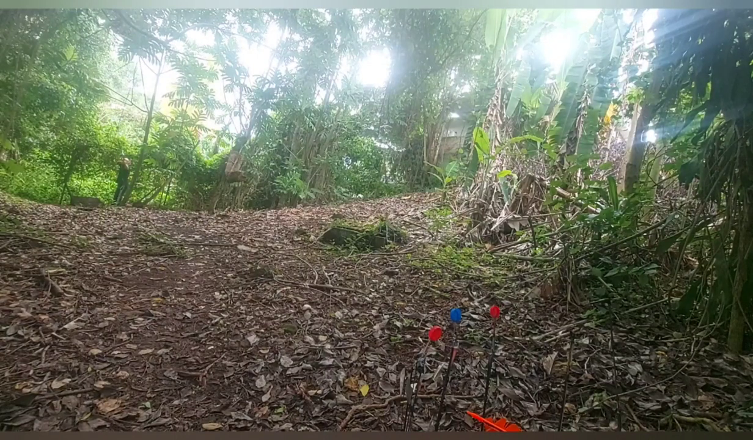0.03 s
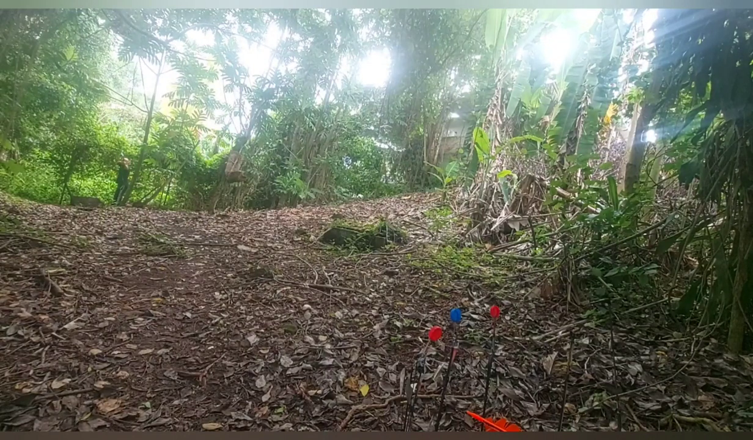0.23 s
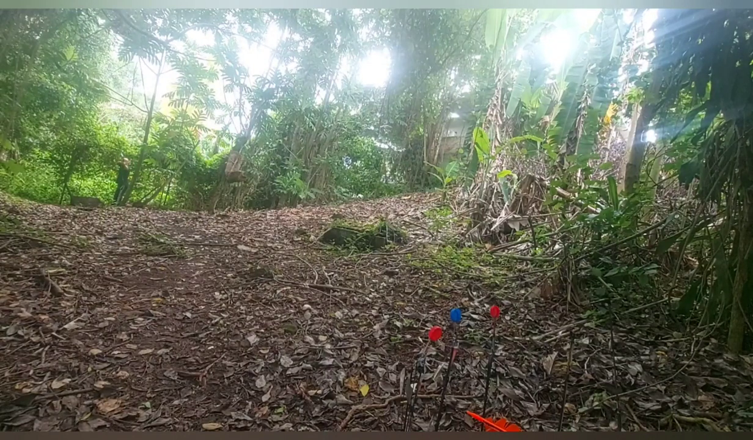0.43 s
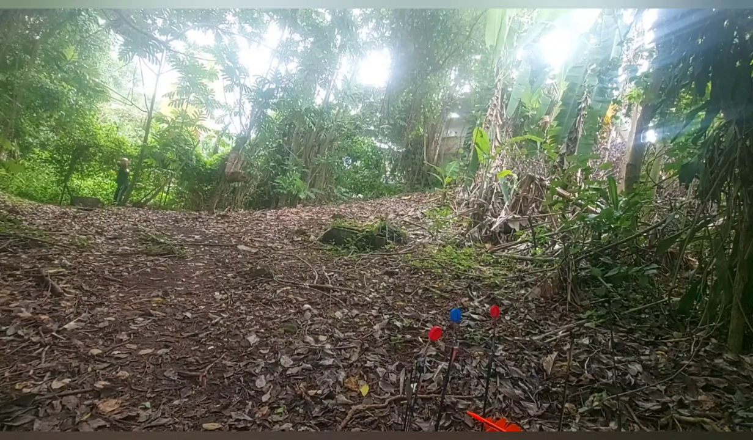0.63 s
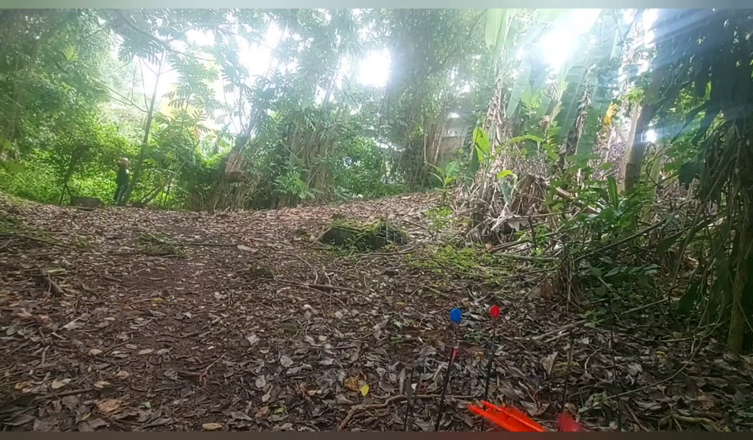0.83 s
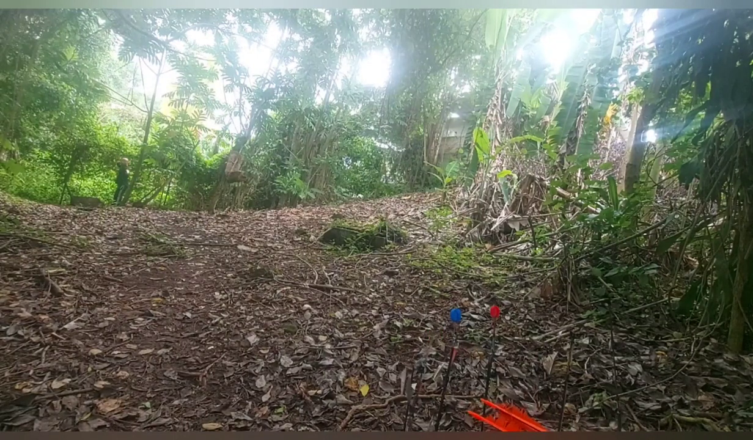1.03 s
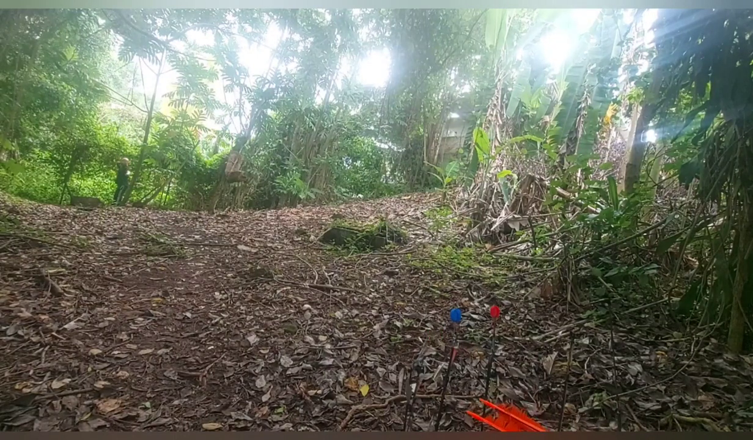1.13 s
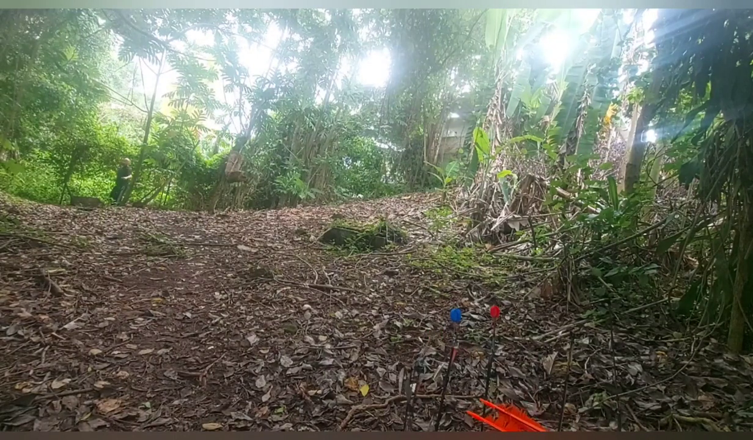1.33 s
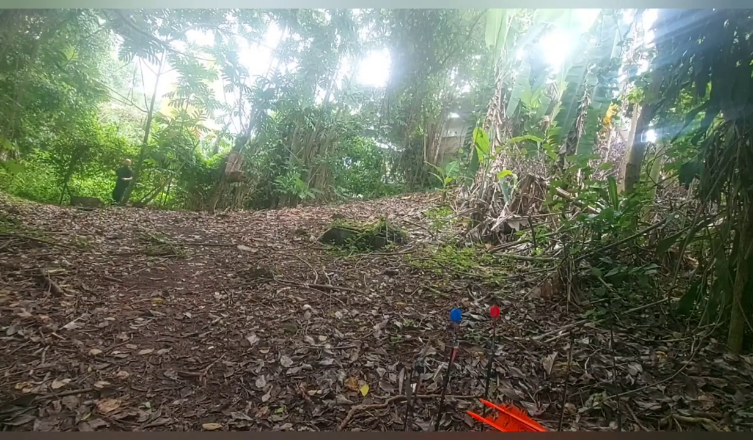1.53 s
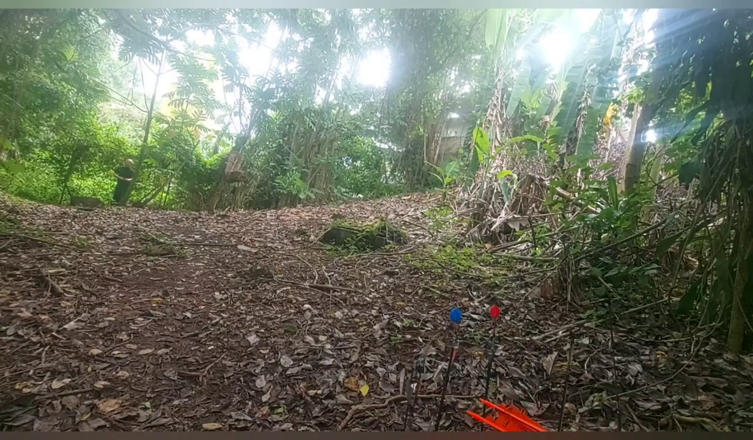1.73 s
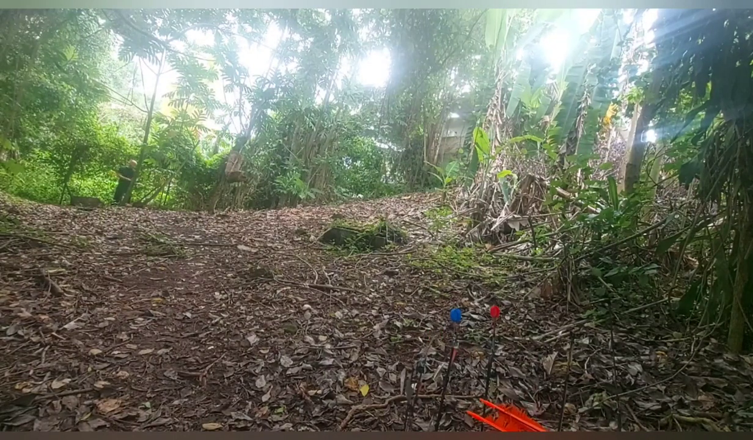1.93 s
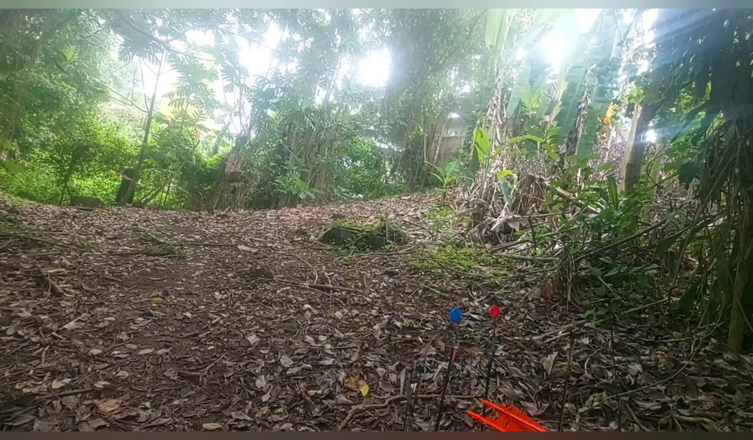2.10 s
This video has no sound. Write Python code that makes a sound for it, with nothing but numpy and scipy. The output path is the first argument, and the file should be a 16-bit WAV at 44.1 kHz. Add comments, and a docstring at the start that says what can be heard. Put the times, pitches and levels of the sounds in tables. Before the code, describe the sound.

Arrow strike: faint distant bow snap, brief whoosh, loud hard crack with thud, then leafy clicks

```python
"""An arrow flies in from far across a forest clearing, cracks through a small target and thuds into the soil.
Its vanes make sinking sine whistles and a growing noise hiss; the hits are sharp pulses, noise and fading tones.
Before the flight a far bow snaps (tones and noise); later the target drops into dry leaves (pulses and noise).
Leaves tick and stir (noise) and a far bird hoots (gliding sines) over quiet air (noise).
Trees echo the bow, thud and bird as tails of noise, and scatter the strike, the landing and a twig's snap."""
import sys
import numpy as np
from scipy import signal
from scipy.fft import rfft, irfft, next_fast_len
from scipy.io import wavfile
from scipy.ndimage import map_coordinates

SR = 44100
rng = np.random.default_rng(int(sys.argv[2]) if len(sys.argv) > 2 else 0)


def materialize(psi):
    """Save the field psi as 16-bit PCM at rate SR to the path in sys.argv[1].

    A 1-D psi becomes a single channel; in a 2-D psi each row is a channel.
    """
    bounded = np.clip(np.atleast_2d(psi).T, -1, 1)
    quanta = np.round(bounded * 32767).astype(np.int16)
    wavfile.write(sys.argv[1], SR, quanta)


N = 95388
T = np.arange(N) / SR  # time of each sample, s

# In all tables t60/s is the time to fade by 60 dB. Levels in a colour only shape the sound;
# likeness of left and right is 1 for the same, 0 for unrelated, below 0 for opposed.

# Colour of the quiet air: f/Hz, level/dB
AIR_COLOUR = [(15, -59.5), (25, -35.5), (64, -2.5), (123, -7.5), (153, -17), (326, -4), (607, -7.5),
              (659, -7.5), (734, -9.5), (840, -7.5), (1130, -13), (2000, -14), (9320, -25), (12200, -23.5),
              (16000, -38)]
# Likeness of the air on the two sides: f/Hz, likeness
AIR_LIKENESS = [(60, .9), (350, .65), (800, 0.066), (2000, 0), (10000, 0)]
# Lean of the air, added on the left and taken off on the right: f/Hz, level/dB
AIR_LEAN_LEFT = [(100, 0.5), (400, 1), (1300, 3.5), (4000, 1.3), (8000, -0.33), (15000, 3)]
# Bird hoots before the echo mix, with the pitch they glide up to: t/s, length/s, f/Hz, level/dB
BIRD_CALLS = [(.465, 0.13, 660, -60), (1.655, 0.089, 662, -62.5), (1.777, 0.0513, 615, -73),
              (1.85, .08, 675, -69.5), (1.951, 0.096, 670, -73), (2.06, .13, 630, -69.5)]
# Colour of the echo among the trees: f/Hz, level/dB
ECHO_COLOUR = [(100, -9), (500, -7), (1200, -9), (2500, -7)]
# Likeness of the two sides in wide sounds other than the air: f/Hz, likeness
WIDE_LIKENESS = [(100, 0.83), (400, 0.3), (900, -0.71), (2000, -.15), (5000, -.1), (12000, 0)]
# Ticks of dry leaves and twigs: t/s, level/dB
LEAF_TICKS = [(0.4977, -59), (0.7948, -18.5), (0.811, -25), (0.8216, -28), (0.984, -47.5), (0.988, -56.5),
              (1.129, -51), (1.178, -49.5), (1.22, -56)]
# Colour of ticks, stirring leaves and splinters: f/Hz, level/dB
LEAF_COLOUR = [(300, -16.5), (1500, -3), (3500, -3.5), (8000, -2), (16000, -10)]
# Colour of the snapping twig: f/Hz, level/dB
TWIG_SNAP_COLOUR = [(300, -36), (1100, -18), (1700, 0), (3200, -0.5), (6000, -5.5), (9000, -9),
                    (16000, -16)]
# Stirring leaves before their flutter: t/s, rise/s, t60/s, level/dB
LEAF_STIRS = [(.295, 0.071, 0.28, -56), (1.3, 0.021, 0.29, -63.5), (1.4, 0.0388, 0.22, -65),
              (2.06, .06, 0.68, -70.5)]
# Noise of the bow string: t/s, rise/s, t60/s, level/dB
STRING_NOISE = [(.554, 0.00202, .12, -50), (.566, 0.0062, 0.38, -33.5)]
# Colour of the string noise: f/Hz, level/dB
STRING_NOISE_COLOUR = [(100, -11), (400, -1), (1300, -6.5), (2200, -9), (4000, -0.5), (7200, -1),
                       (12000, -7.5), (16000, -18.5)]
# Tones of the string slipping free: f/Hz, level/dB, t60/s
STRING_SLIP = [(630, -48, .06), (1060, -56, 0.034)]
# Tones of the bow limbs: f/Hz, level/dB, t60/s
BOW_LIMBS = [(73, -51.5, .15), (302, -37, 0.22), (397, -30.5, 0.068), (1082, -44.5, .13),
             (1782, -52.5, .22), (2140, -50, 0.24)]
# Contacts of the target with the leaves, before colouring: t/s, level/dB
LEAF_CONTACTS = [(1.0271, -18), (1.0301, -15), (1.0328, -13), (1.044, -22.5), (1.0501, -23)]
# Colour of those contacts and their crunch: f/Hz, level/dB
CONTACT_COLOUR = [(40, -11), (170, 1.5), (350, 1), (900, 2.5), (1500, -5.5), (2500, -6), (4000, 1),
                  (6000, -0.5), (9000, -5), (16000, -5)]
# Colour of the landing scattered by the trees: f/Hz, level/dB
LANDING_WASH = [(100, 0), (250, 6), (900, -3.5), (1800, -2), (4000, -1), (8000, -3.5), (16000, -4.5)]
# Tones of the soil: f/Hz, level/dB, t60/s
SOIL_THUD = [(146.3, -11.5, 0.07), (297, -19.5, 0.092), (415, -30, .08), (631, -31, 0.11)]
# Whistle of the vanes, pitch at release, level before flutter and lean: f/Hz, level/dB
VANE_WHISTLE = [(870, -56.5), (730, -63), (515, -68.5)]
# Colour of the vane hiss: f/Hz, level/dB
VANE_HISS_COLOUR = [(100, -20.5), (400, -5.5), (900, -7.5), (2000, -6), (4500, -4), (8000, -3.5),
                    (13000, -2.5), (16000, -2)]
# Colour of the air pushed by the arrow: f/Hz, level/dB
PUSHED_AIR_COLOUR = [(25, -25), (70, -1.5), (110, -10.5), (220, -28.5), (1000, -47.5)]
# Colour of the point tearing in: f/Hz, level/dB
TEARING_COLOUR = [(200, -1), (1500, -1.5), (4000, 3), (7500, 2.5), (10500, -8.5), (13000, 0),
                  (16000, -13.5)]
# Colour of the point's hard crack: f/Hz, level/dB
POINT_CRACK_COLOUR = [(30, -32.5), (150, -10.5), (300, -4), (550, 6), (1000, 3.5), (1500, -5), (2600, 0.5),
                      (4000, -2.5), (7000, -16.5), (16000, -33.5)]
# Brief tones of the target's walls: f/Hz, level/dB, t60/s
TARGET_WALLS = [(2460, -6, 0.0035), (3790, -6.5, .005), (7330, -9.5, .004)]
# Hollow tones of the whole target: f/Hz, level/dB, t60/s
TARGET_HOLLOW = [(345, -7, 0.033), (549, -19.5, 0.052), (987.4, -2, 0.012)]
# Colour of the strike scattered by the trees: f/Hz, level/dB
STRIKE_WASH = [(100, -17), (300, 2), (650, 2), (1300, 0), (2300, -4.5), (3200, -1), (6500, -3.5),
               (10000, -7), (16000, -8.5)]
# Level change on the left for sounds from the right: f/Hz, level/dB
LEFT_SHADING = [(900, 1), (2200, 0), (4500, -11.5), (12000, -7)]

RELEASE_S, STRIKE_S, SECOND_WALL_S, GROUND_S = .567, .7792, .7806, .793  # the arrow's journey
SCATTER_RISE_S = .014  # build-up of both the echo and the scattering
SIDE_LAG_S = .00036  # delay of the left side for the strike and the ticks


def amp(db):
    """Turn decibels into gain."""
    return 10 ** (np.asarray(db) / 20)


def unit(x):
    """Scale to an average strength (rms) of 1."""
    return x / np.sqrt(np.mean(x ** 2) + 1e-20)


def along(points, hz):
    """Read a (f/Hz, value) curve, with straight lines between points on a log pitch axis."""
    f, value = np.transpose(points)
    return np.interp(np.log(hz + 1), np.log(f + 1), value)


def filtered(x, response):
    """Multiply the spectrum of x by a response that depends on frequency."""
    size = next_fast_len(N + SR // 2)
    hz = np.fft.rfftfreq(size, 1 / SR)
    return irfft(rfft(x, size) * response(hz), size)[..., :N]


def late(x, lag):
    """Delay x by lag seconds, by turning the phase of each frequency."""
    return filtered(x, lambda hz: np.exp(-2j * np.pi * hz * lag))


def wobble(rate):
    """A smooth random curve through rate random points a second."""
    return map_coordinates(rng.standard_normal(2048), [T * rate], mode="wrap")


def noise(colour):
    """Coloured one-channel noise of rms 1."""
    return unit(filtered(rng.standard_normal(N), lambda hz: amp(along(colour, hz))))


def wide(colour, alike):
    """Coloured stereo noise: a shared part and an opposed part, mixed to set the sides' likeness."""
    def shares(hz):
        angle = np.arccos(np.clip(along(alike, hz), -1, 1)) / 2
        return np.array([np.cos(angle), np.sin(angle)])

    mid, side = filtered(np.array([noise(colour), noise(colour)]), shares)
    return unit(np.array([mid + side, mid - side]))


def burst(s, rise, t60, db):
    """Loudness curve that starts at s, rises quickly and dies away."""
    t = np.maximum(T - s, 0)
    return amp(db - 60 * t / t60) * (1 - np.exp(-t / rise))


def ring(s, modes, rise):
    """A struck object rings at s as a sum of fading sine tones."""
    return sum(burst(s, rise, t60, db) * -np.sin(2 * np.pi * hz * (T - s)) for hz, db, t60 in modes)


def blows(rows, colour):
    """Sharp coloured pulses that start at the hit and never before it (minimum phase)."""
    hz = np.fft.rfftfreq(2 * N, 1 / SR)
    # folding the cepstrum forward in time gives the minimum-phase pulse
    cepstrum = irfft(np.log(amp(along(colour, hz))))
    cepstrum[1:N] *= 2
    cepstrum[N + 1:] = 0
    pulse = np.exp(rfft(cepstrum))
    hits = sum(-amp(db) * np.exp(-2j * np.pi * hz * s) for s, db in rows)
    return irfft(pulse * hits)[:N]


def from_right(x, lag):
    """Sound from the right reaches the left side later and duller."""
    left = filtered(late(x, lag), lambda hz: amp(along(LEFT_SHADING, hz)))
    return np.array([left, x])


def forest(x, wet_db):
    """Trees return a tone as many small echoes, made by smearing it with a fading noise tail."""
    tail = wide(ECHO_COLOUR, WIDE_LIKENESS) * burst(0, SCATTER_RISE_S, .22, 0)
    tail = tail / np.linalg.norm(tail[0])
    return amp(wet_db) * signal.fftconvolve(x[None], tail, axes=1)[:, :N]


def scatter(s, colour, db):
    """A sharp hit returns as a dense noise wash from near trunks and leaves, with a faint long tail."""
    near = burst(s, SCATTER_RISE_S, .21, db)
    far = burst(s, SCATTER_RISE_S, .99, db - 32)
    return wide(colour, WIDE_LIKENESS) * (near + far)


def low_cut(x):
    """Take out the deepest bass, below about 58 Hz."""
    return signal.sosfilt(signal.butter(4, 58, "high", fs=SR, output="sos"), x)


def air():
    """The breeze in the clearing is a soft noise, mostly leaning left, that slowly settles."""
    start_db, fade_db_per_s = -67.5, .95
    hush = wide(AIR_COLOUR, AIR_LIKENESS)
    hush = filtered(hush, lambda hz: amp(along(AIR_LEAN_LEFT, hz) * [[1], [-1]]))
    return hush * amp(start_db - fade_db_per_s * T + .31 * wobble(2.7))


def bird():
    """Soft hoots are sine tones that scoop up to their pitch and waver, half lost in echo."""
    scoop, scoop_s, waver = .2, .022, .02  # scoop and waver are fractions of the pitch
    song = np.zeros(N)
    for s, length, hz, db in BIRD_CALLS:
        t = np.maximum(T - s, 0)
        pitch = hz * (1 - scoop * np.exp(-t / scoop_s) + waver * wobble(160))
        swell = np.sqrt(np.abs(np.sin(np.pi * np.clip(t / length, 0, 1))))
        song += amp(db) * swell * np.sin(2 * np.pi * np.cumsum(pitch) / SR)
    return amp(-.5) * song + forest(song, wet_db=4)


def litter():
    """Dry leaves tick in short noise bursts and stir in fluttering ones; one twig snaps."""
    twig_s = 1.1895
    ticks = noise(LEAF_COLOUR) * sum(burst(s, .0002, .012, db) for s, db in LEAF_TICKS)
    twig = noise(TWIG_SNAP_COLOUR) * burst(twig_s, .00018, .0083, -46.5)
    flutter = amp(3.1 * wobble(200))
    stir = wide(LEAF_COLOUR, WIDE_LIKENESS) * flutter * sum(burst(*row) for row in LEAF_STIRS)
    return from_right(ticks, SIDE_LAG_S) + twig + scatter(twig_s, TWIG_SNAP_COLOUR, db=-59.5) + stir


def bow():
    """The far string slips free, swishes and snaps as noise; the limbs ring briefly as tones."""
    tones = ring(.553, STRING_SLIP, rise=.0027) + ring(RELEASE_S, BOW_LIMBS, rise=.0086)
    string = wide(STRING_NOISE_COLOUR, WIDE_LIKENESS) * sum(burst(*row) for row in STRING_NOISE)
    return tones + forest(tones, wet_db=-13) + string


def landing():
    """The target falls into the leaves: each contact is a pulse with a short crumbling noise."""
    crunch_db, crunch_t60 = -26.5, .016  # crunch level is relative to its contact
    crumbling = sum(burst(s, .00013, crunch_t60, db + crunch_db) for s, db in LEAF_CONTACTS)
    crunch = noise(CONTACT_COLOUR) * crumbling
    contacts = blows(LEAF_CONTACTS, CONTACT_COLOUR)
    wash = scatter(LEAF_CONTACTS[0][0], LANDING_WASH, db=-42)
    return from_right(contacts + crunch, lag=.00025) + wash


def thud():
    """The arrow buries itself beside the microphone: the soil rings low and the stuck shaft swings."""
    shaft = ring(.805, [(79, -9, .069)], rise=.005)  # f/Hz, level/dB, t60/s
    low = ring(GROUND_S, SOIL_THUD, rise=.005) + shaft
    return np.array([amp(-1.6) * late(low, .00025), low]) + forest(low, wet_db=-22.5)


def flight():
    """The vanes whistle, sinking as the arrow slows; their hiss and the air pushed ahead grow as it nears."""
    sag_per_s = .15  # fraction of the starting pitch lost each second
    hiss_db, hiss_half_s = -42.5, .05  # hiss at the target, and the time before it with half that strength
    draught_db, draught_half_s = -50.5, .02  # push of air at the target, doubling in each such time
    flown, to_go = np.maximum(T - RELEASE_S, 0), np.maximum(STRIKE_S - T, 0)
    start = 1 - np.exp(-flown / .01)
    stop = np.clip((GROUND_S - T) / (GROUND_S - STRIKE_S), 0, 1)
    turns = np.cumsum(1 - sag_per_s * flown + .009 * wobble(250)) / SR
    whistle = sum(amp(db + 2 * wobble(110)) * np.sin(2 * np.pi * hz * turns) for hz, db in VANE_WHISTLE)
    hiss = amp(hiss_db) * wide(VANE_HISS_COLOUR, WIDE_LIKENESS) / (1 + to_go / hiss_half_s)
    draught = amp(draught_db) * noise(PUSHED_AIR_COLOUR) * 2 ** (-to_go / draught_half_s)
    lean_left = amp([[1.3], [-1.3]])
    return start * stop * ((whistle + hiss) * lean_left + draught)


def strike():
    """The point tears in and cracks the target; both its walls ring briefly and its body hollowly."""
    tear_s, tear_db, tear_rise_s, tear_t60 = .7779, -10.5, .0016, .011  # rises 20 dB in each tear_rise_s
    before, after = np.maximum(tear_s - T, 0), np.maximum(T - tear_s, 0)
    tearing = amp(tear_db - 20 * before / tear_rise_s - 60 * after / tear_t60)
    tear = np.array([noise(TEARING_COLOUR) * amp(-7.5), noise(TEARING_COLOUR)]) * tearing  # weaker on the left
    crack = blows([(STRIKE_S, 13.5)], POINT_CRACK_COLOUR)
    walls = sum(ring(s, TARGET_WALLS, rise=.0002) for s in (STRIKE_S, SECOND_WALL_S))
    hollow = ring(STRIKE_S, TARGET_HOLLOW, rise=.0014)
    splinters = noise(LEAF_COLOUR) * burst(SECOND_WALL_S, .0003, .022, -16)
    hit = from_right(crack + walls + hollow + splinters, SIDE_LAG_S)
    return tear + hit + scatter(STRIKE_S, STRIKE_WASH, db=-23)


def scene():
    """Add all the sounds in stereo; only the three hits lose their deepest bass."""
    background = air() + bird() + litter()
    hits = low_cut(landing() + thud() + strike())
    return background + bow() + hits + flight()


def record(dry):
    """Cut off peaks beyond full scale, then remove everything from 16100 Hz up."""
    return filtered(np.clip(dry, -1, 1), lambda hz: hz < 16100)


dry = scene()
out = record(dry)
materialize(out)
```